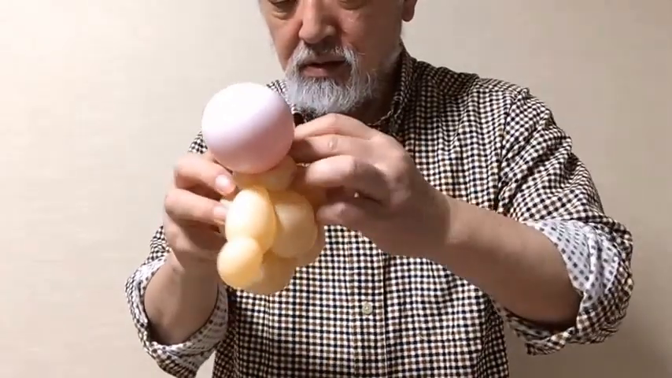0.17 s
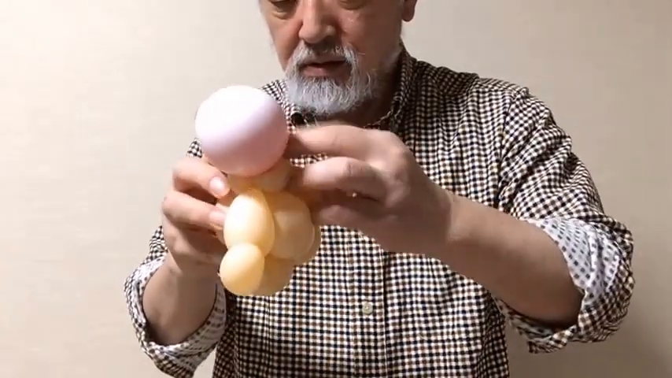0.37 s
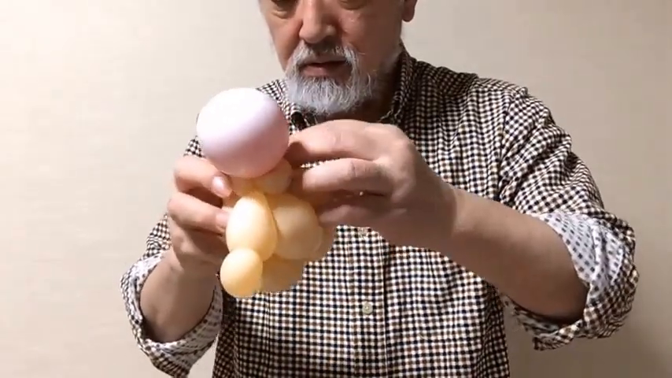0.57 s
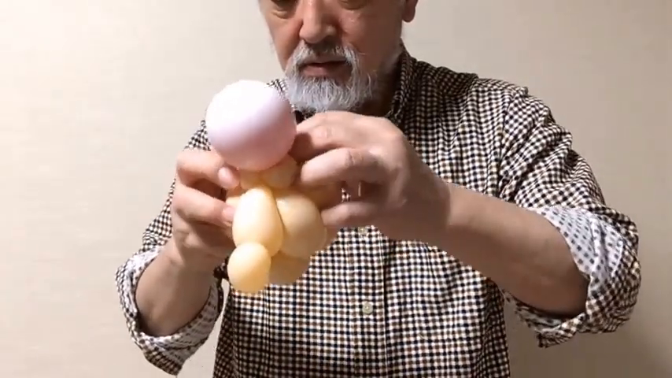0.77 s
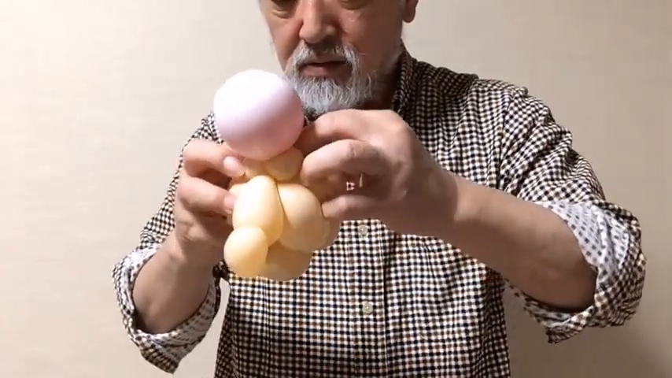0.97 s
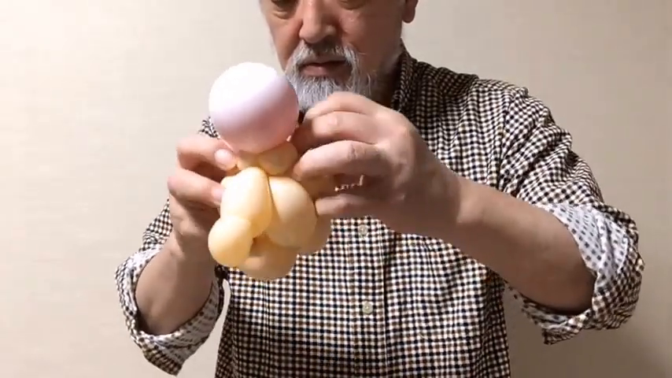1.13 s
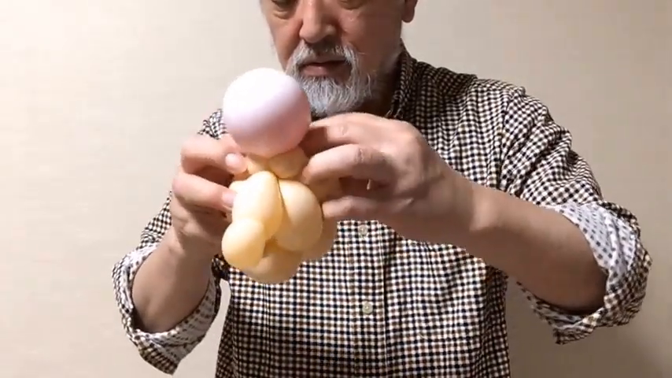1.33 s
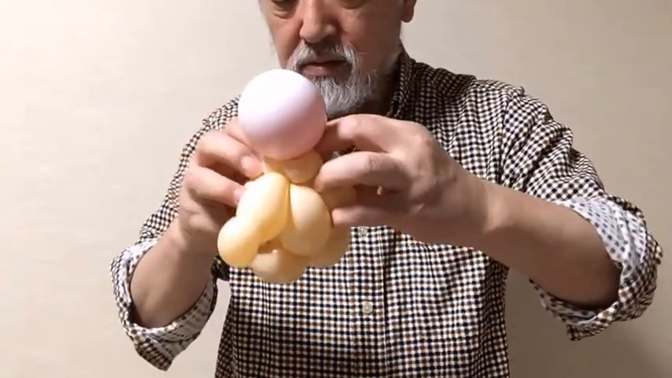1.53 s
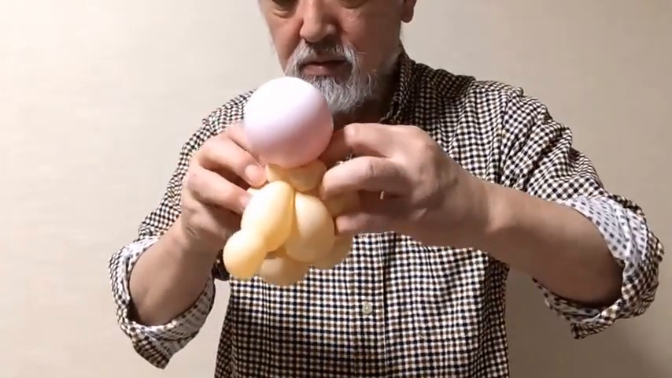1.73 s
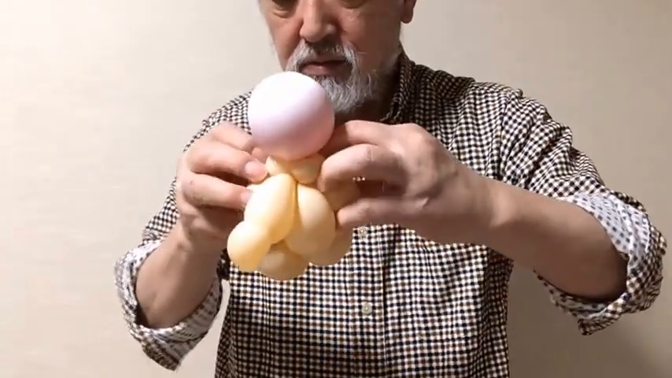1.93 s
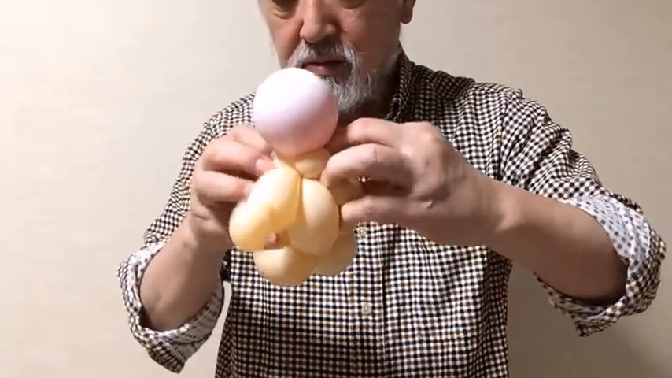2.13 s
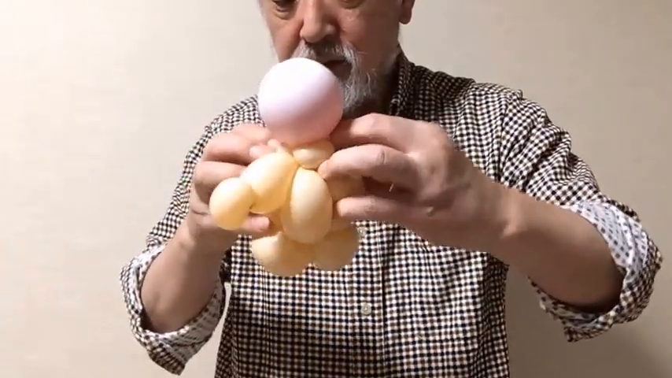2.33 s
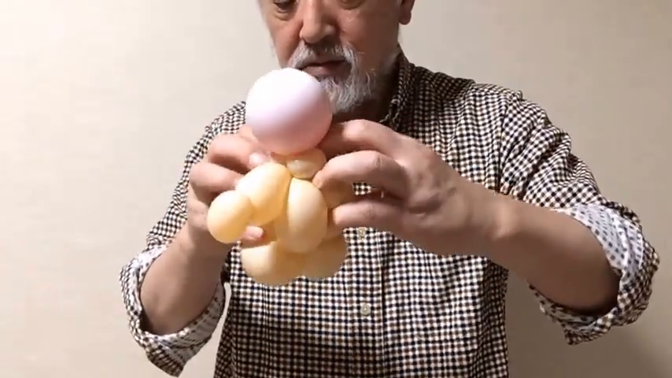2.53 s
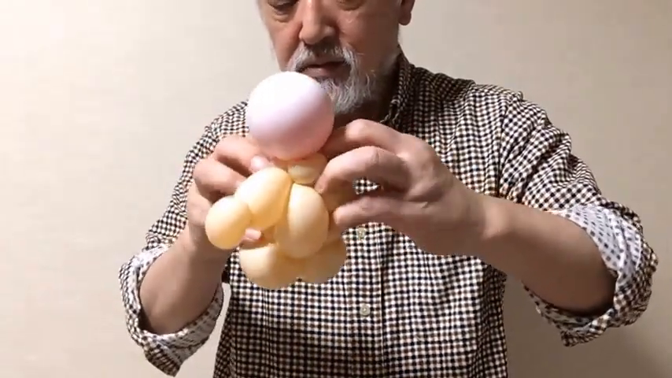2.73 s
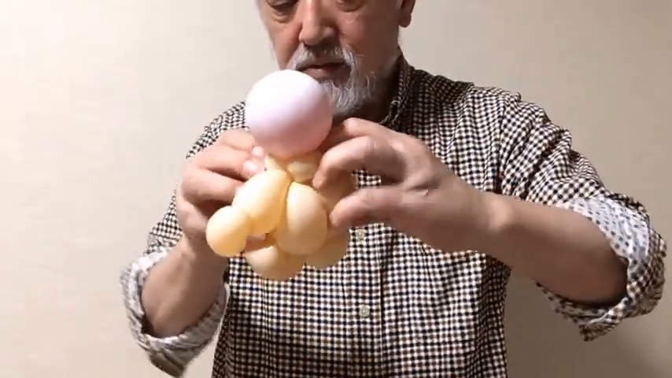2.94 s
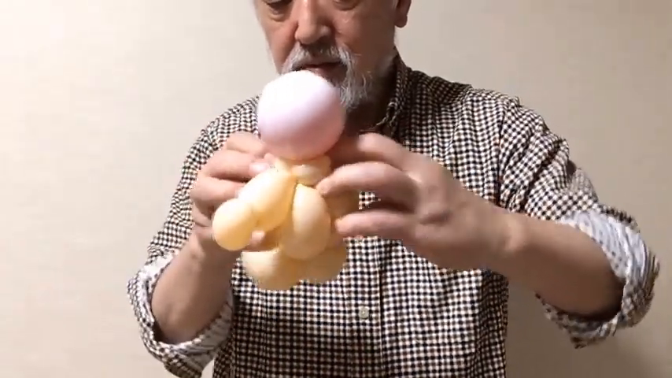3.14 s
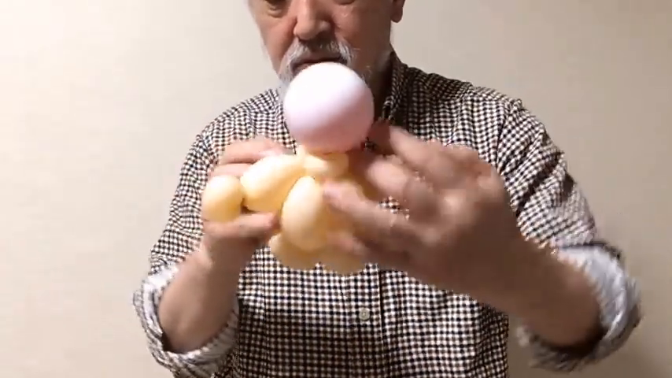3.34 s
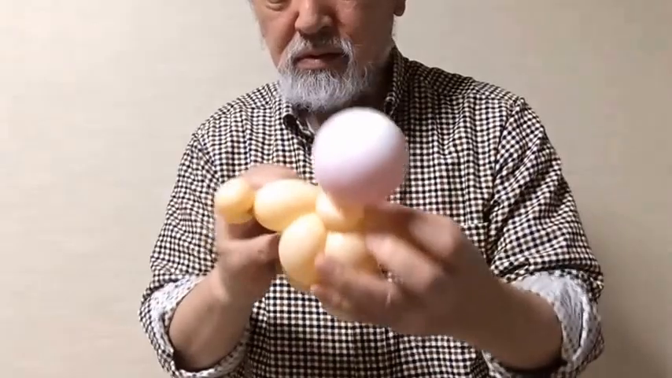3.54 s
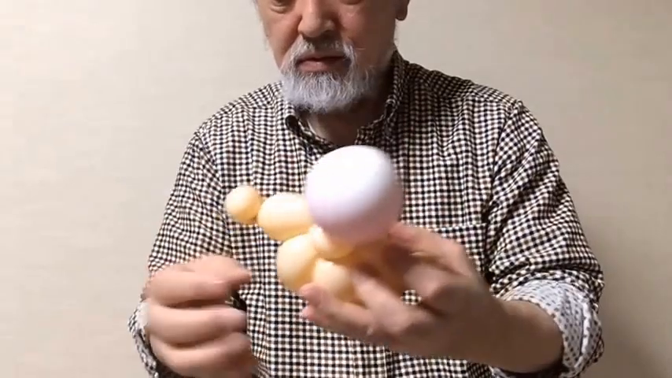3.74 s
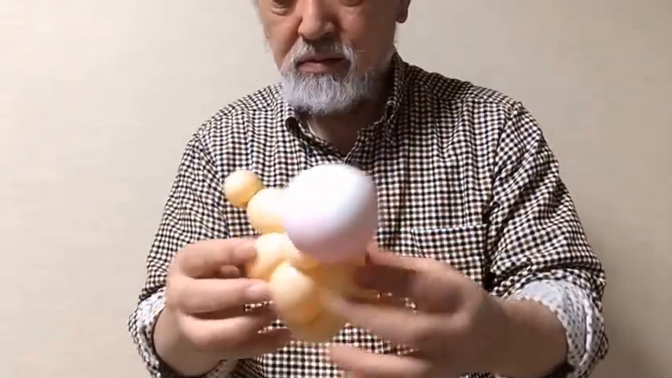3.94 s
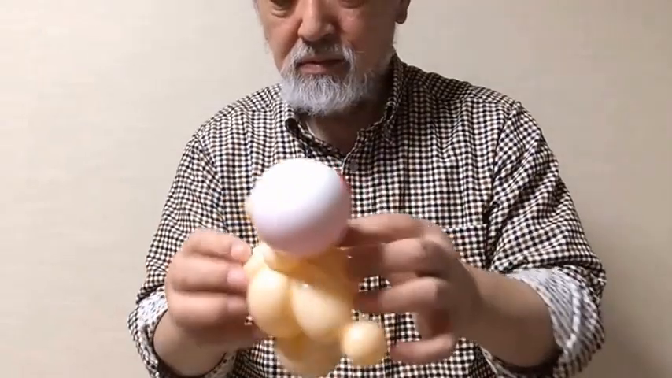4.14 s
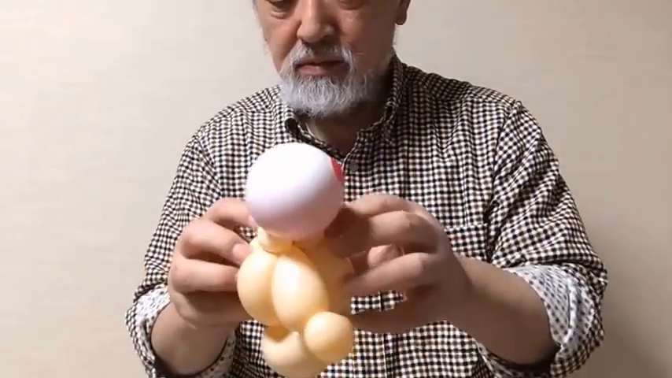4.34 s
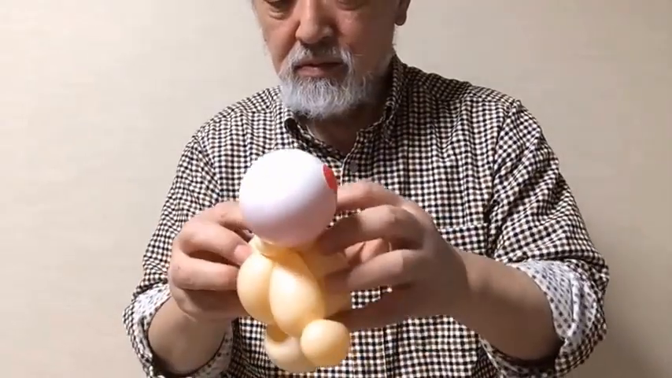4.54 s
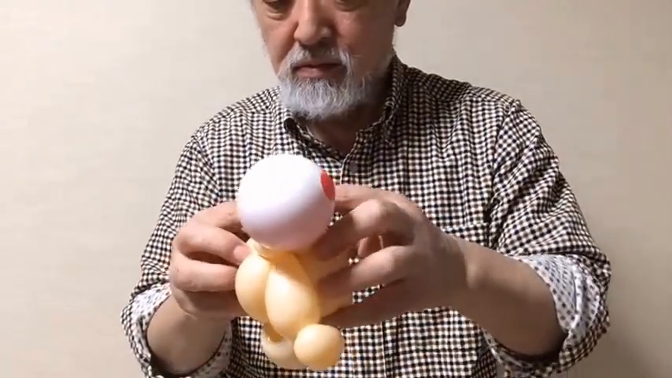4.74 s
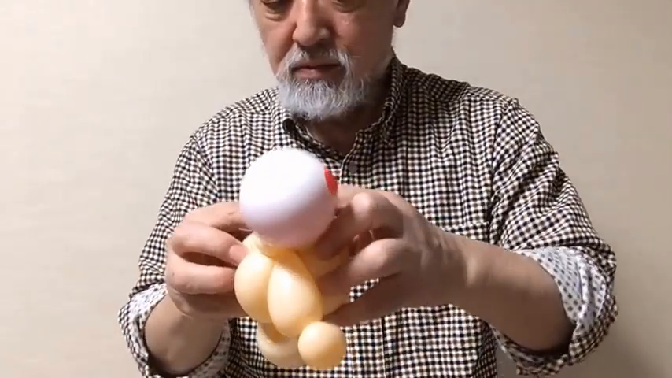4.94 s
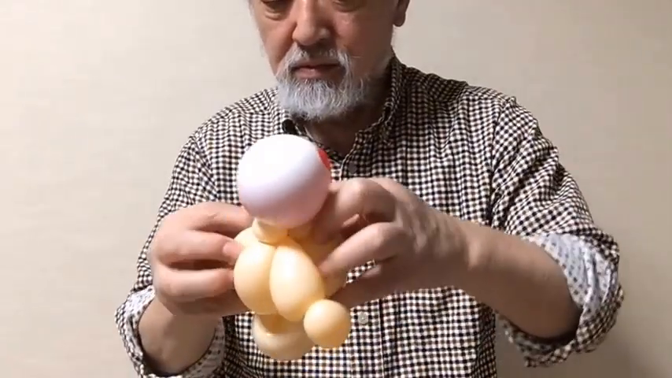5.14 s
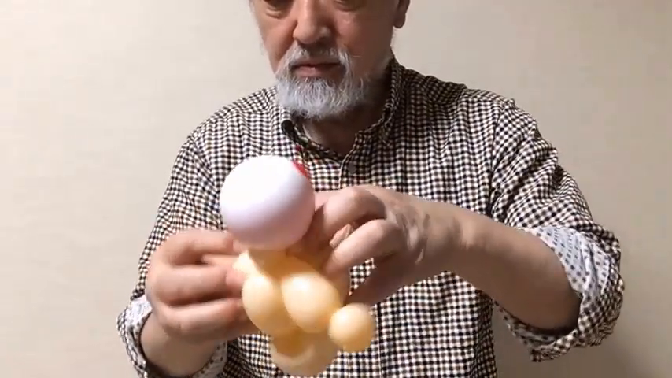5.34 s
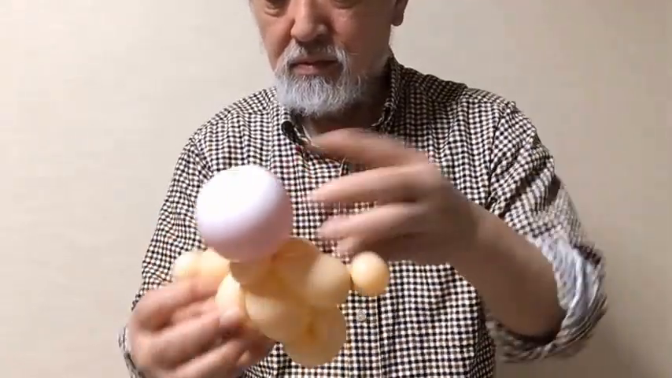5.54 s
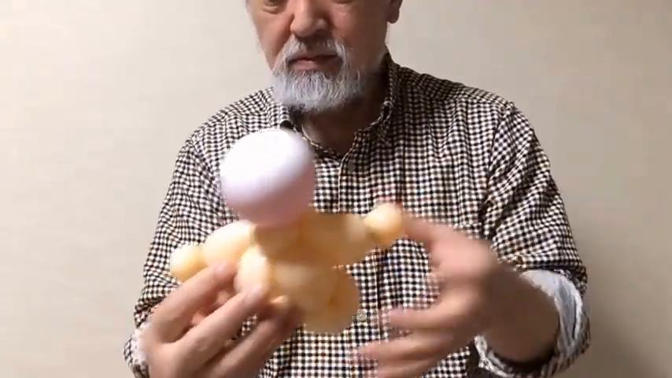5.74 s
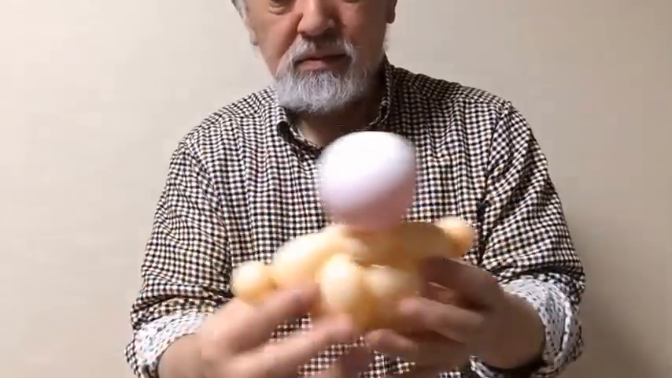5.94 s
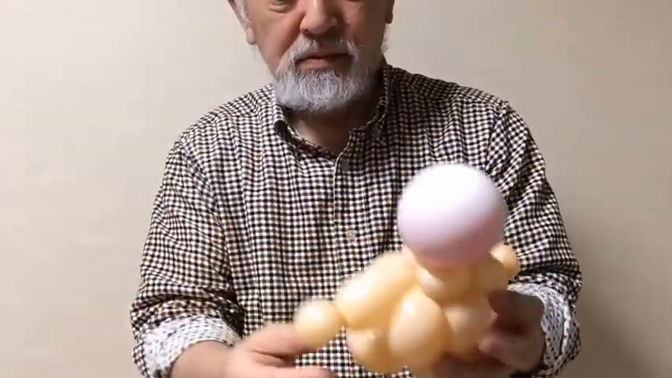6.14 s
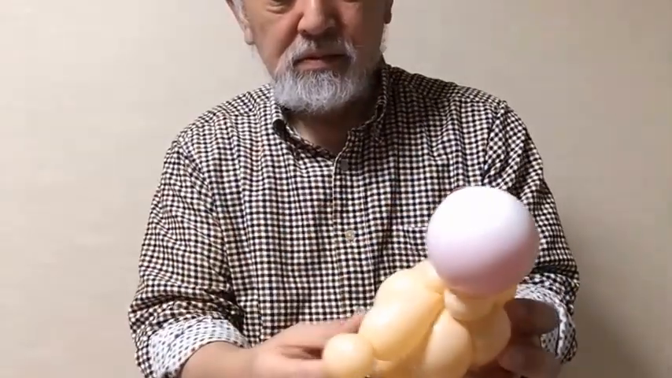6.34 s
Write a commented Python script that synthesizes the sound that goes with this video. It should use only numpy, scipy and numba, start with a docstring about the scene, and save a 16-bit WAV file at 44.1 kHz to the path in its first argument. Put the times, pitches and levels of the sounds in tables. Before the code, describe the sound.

A quiet indoor room with faint, steady air; a camera microphone about a metre from hands twisting small inflated balloons. A tiny squeak opens, then fine dry finger-rub crackle comes and goes in uneven strokes. Snaps click at 0.25 and 0.37 s, and short weak creaks appear around 0.7 and 1.2-1.4 s. At about 1.65 s a tight cluster of hard, hollow rubber snaps is the loudest moment. Brief, strong squeaky creaks come at 2.3-2.5 s, some rising quickly in rate, with duller snaps near 2.7 s. Two short chirps sound around 3.2 s, then a quieter gap from about 3.6 s. From 4 to 5 s, scattered ticks and a slow stuttering creak return; quick squeaks cluster at 5.2-5.5 s. One last chirp at 6 s, then near silence. Soft low bumps and rustling sit underneath, with a short dull room tail.

```python
"""A quiet room: hands twist a figure of small latex balloons, a metre from a camera microphone.
Rubber sticks to rubber and slips free: alone as snaps, in quickening or slowing trains as creaks and
squeaks, and as a fine crackle while fingers rub. Each slip rings the taut skin and the air inside.
Soft fingertip bumps and a low rustle lie beneath; the walls add a short tail over faint room tone."""
import sys
import numpy as np
from scipy import signal
from scipy.fft import rfft, irfft
from scipy.io import wavfile
from numba import njit

SR = 44100
rng = np.random.default_rng(int(sys.argv[2]) if len(sys.argv) > 2 else 0)


def int16_out(signal):
    """Quantize to a 16-bit WAV file."""
    q = np.round(np.clip(np.atleast_2d(signal).T, -1, 1) * 32767)
    wavfile.write(sys.argv[1], SR, q.astype(np.int16))


N = 282240  # samples, 6.4 s

# trains of slips: (start [s], end [s], first rate [slips/s], last rate [slips/s],
# first level [dB], last level [dB], patch ring [Hz], crispness [dB])
SLIP_TRAINS = [ (.001, 0.014, 370, 290, -25.5, -29.5, 1535, -42),
               (0.1, 0.314, 212, 186, -49.5, -37, 7560, -6.5), (0.46, 0.508, 129, 530, -30, -39, 3760, 13),
               (0.689, 0.732, 173, 273, -28.5, -22, 1565, -7.5),
               (0.73, 0.759, 178, 204, -23, -34, 1115, -7),
               (1.217, 1.26, 270, 320, -32.5, -34.5, 2040, -3.5),
               (1.267, 1.292, 870, 510, -30.5, -37, 2280, -3), (1.365, 1.415, 182, 146, -33, -33, 1310, -9),
               (1.577, 1.6, 99, 81, -26, -41, 1440, -14.5), (2.2771, 2.315, 153, 173, -17, -15, 1790, -8.5),
               (2.315, 2.367, 235, 510, -19, -26.5, 1130, -3), (2.4768, 2.51, 165, 580, -13, -27, 1430, -5),
               (3.158, 3.2, 270, 510, -21, -40, 6250, 3), (3.232, 3.257, 250, 874, -20, -34, 892, 3),
               (4.049, 4.061, 355, 330, -27, -24, 1090, -4),
               (4.2936, 4.359, 35.7, 55, -31, -25.5, 2010, -6.5),
               (4.544, 4.564, 300, 476, -25, -28.5, 1277, -4.5),
               (4.737, 4.806, 117, 116, -43.5, -37, 2500, -2.5),
               (5.143, 5.147, 1580, 2000, -35.5, -34.5, 1750, -5),
               (5.266, 5.279, 290, 680, -31.5, -26.5, 1280, -4.5),
               (5.311, 5.368, 480, 283, -27.5, -43.5, 1210, -10),
               (5.421, 5.47, 420, 797, -17, -23.5, 1354, -7), (5.496, 5.508, 1150, 990, -49, -26, 970, -17),
               (6.013, 6.022, 840, 1080, -21, -32.5, 2100, -4.5), ]
# lone slips: (time [s], level [dB], patch ring [Hz], crispness [dB])
LONE_SLIPS = [(0.253, -13, 3400, -15), (0.317, -30.5, 3880, 4.5), (0.368, -16, 4400, -2.5),
              (0.38, -19, 1700, 0.5), (0.388, -24, 4300, 1.5), (0.62, -38, 4360, 11.5),
              (0.928, -20, 2100, -2.5), (1.353, -25, 1320, -13), (1.443, -40, 3750, 2),
              (1.509, -17.5, 2420, -18.5), (1.645, -1, 2800, -21.5), (1.658, -8.5, 1600, -12),
              (1.665, -6.5, 3390, -14), (1.678, -8, 1810, -12), (2.028, -22, 4000, -11.5),
              (2.259, -18, 1430, -15), (2.615, -21, 2650, -15), (2.729, -18, 850, 0),
              (2.744, -19, 940, -2.5), (2.751, -23.5, 875, 4), (3.094, -26, 1200, 4),
              (3.575, -30, 1360, -9.5), (3.982, -20.5, 1145, -12), (4.092, -19.5, 1430, -23),
              (4.095, -19, 800, -6), (4.407, -20.5, 1850, -6), (4.437, -21.5, 2000, -13),
              (4.488, -26.5, 1010, -5), (4.506, -23, 980, -6), (4.524, -20, 1830, -8.5),
              (4.632, -27, 2500, -0.5), (4.8, -22, 1440, -6), (4.826, -31.5, 1770, 0),
              (4.843, -35, 1790, -0.5), (4.881, -38, 2000, -0.5), (4.998, -36, 1540, 8),
              (5.227, -15.5, 1500, -4.5), (5.78, -29, 1650, -12.5), (5.867, -33.5, 1660, -11.5)]
# strokes of the fingers over the latex: (full contact from [s], full contact to [s],
# first level [dB], last level [dB], crispness [dB])
FINGER_STROKES = [ (.01, 0.078, -36, -59.5, 0.5), (0.163, 0.262, -45, -39, 6),
                  (0.387, 0.419, -39.5, -39.5, 3), (0.561, 0.89, -41.5, -46.5, 1.5),
                  (0.896, 1.008, -37, -45.5, 3.5), (1.013, 1.174, -45, -39.5, 0.5),
                  (1.193, 1.285, -45.5, -35, 0.5), (1.458, 1.646, -41.5, -43, -1.5),
                  (1.65, 1.858, -42.5, -47, 0.5), (1.883, 1.979, -48.5, -42, -3),
                  (2.092, 2.241, -46, -47.5, -2.5), (2.384, 2.417, -40, -44.5, -9),
                  (2.476, 2.628, -41, -52.5, -2.5), (2.693, 2.814, -44.5, -45, 1.5),
                  (2.833, 3.1, -41.5, -37.5, -1.5), (3.11, 3.314, -35, -43.5, -1.5),
                  (3.39, 3.635, -61.5, -55, -3.5), (3.954, 4.056, -52, -64.5, -5.5),
                  (4.194, 4.364, -42.5, -40.5, 0), (4.407, 4.564, -41, -31, -3),
                  (4.642, 4.694, -34, -41, -0.5), (4.727, 5.087, -47.5, -42.5, -1),
                  (5.109, 5.196, -36, -43, 2), (5.203, 5.536, -43, -33.5, -1.5),
                  (5.626, 5.92, -48.5, -57, -8), (5.985, 6.066, -35, -54.5, -3.5),
                  (6.394, 6.394, -53, -73, 4.5), ]
# resonances of the balloons' air and skin: (frequency [Hz], width [Hz], level [dB])
BODY_MODES = [(342.5, 224, -2.5), (469.4, 66, -11), (1050, 226, 2), (1274, 439, 7.5), (1734, 600, 6),
              (2690, 625, 6.5)]
# short-lived high modes of the latex around the contact: (frequency [Hz], width [Hz], level [dB])
SKIN_MODES = [(3590, 2400, 4), (6050, 2120, 3.5), (6944, 1570, 1), (12000, 27000, -3)]
# fingertips pressing the balloons: (time [s], level [dB])
FINGERTIP_BUMPS = [(0.251, -52), (2.284, -38), (2.741, -41), (3.975, -48), (4.243, -37), (4.996, -40)]
# spectral shape of the room's air: (frequency [Hz], relative level per Hz [dB])
ROOM_SPECTRUM = [(30, -28), (65, -8), (113, -10.5), (200, -0.5), (426, -10), (15000, -37.5)]

# a smaller, higher spot of skin flicked by every slip: middle pitch, level, cycles to fade by 1/e
FLICK_HZ, FLICK_DB, FLICK_CYCLES = 4250, -5.5, 1.3
TEAR_S = 0.0027  # decay of the ragged tear after a slip
LOCKS_AT = .6  # share of a train after which its slip rate holds
UNEVEN = .08  # scatter of the first gaps in a train, as a share of the gap
# scatter of patch pitch and crispness at the start of a train
RETUNE_OCT, EDGE_DB = .13, 3
RUB_PER_S, RUB_SPREAD_DB, RUB_HZ = 1500, 5.1, 1424
# how fast a stroke swells before full contact and dies after it
TOUCH_DB_PER_S, LIFT_DB_PER_S = 349.5, 352.5
WALLS_T60_S, WALLS_DB, WALLS_HZ = 0.15, -11, 5500
ROOM_DB = -68.5  # RMS at the microphone, before its filters
TOP_HZ = 15400


def slips(s, db, hz, crisp_db, patch_db, body_db, skin_db, cycles, ragged, above_hz):
    """A slip jerks the patch, the whole body and the high skin modes, which a brief ragged tear stirs on."""
    at = np.clip((s * SR).astype(int), 0, N - 1)
    skin_level_db = db + crisp_db + skin_db
    patch, blow, jerk = np.zeros(N), np.zeros(N), np.zeros(N)
    ring_patches(patch, at, undb(db + patch_db), hz, cycles)
    # the flicked spot's pitch jumps about
    flick_hz = FLICK_HZ * 2 ** (0.33 * drift(s, 300, 40))
    ring_patches(patch, at, undb(skin_level_db + FLICK_DB), flick_hz, FLICK_CYCLES)
    np.add.at(blow, at, undb(db + body_db))
    np.add.at(jerk, at, undb(skin_level_db))
    fade = np.exp(-1 / (TEAR_S * SR))
    tear = signal.lfilter([1], [1, -fade], jerk) * rng.standard_normal(N)
    body = ring(blow, BODY_MODES)
    skin = ring(jerk + ragged * tear, SKIN_MODES)
    # small balloons push little air at long wavelengths
    return signal.lfilter(*signal.butter(3, above_hz, "high", fs=SR), patch + body + skin)


@njit
def ring_patches(out, start, size, hz, cycles):
    """Each slip twangs its own patch of skin: a decaying sine that fades by 1/e in the given cycles."""
    for k in range(len(start)):
        w = 2 * np.pi * hz[k] / SR
        turn = np.exp(1j * w - w / (2 * np.pi * cycles))
        z = size[k] + 0j
        for i in range(start[k], min(start[k] + int(40 * cycles / w), len(out))):
            out[i] += z.imag
            z *= turn


def ring(x, modes):
    """Sum of damped resonances with alternating sign, each scaled by its level for a single blow."""
    out = 0
    for k, (hz, width, db) in enumerate(modes):
        r = np.exp(-np.pi * width / SR)
        w = 2 * np.pi * hz / SR
        mode = signal.lfilter([0, np.sin(w)], [1, -2 * r * np.cos(w), r * r], x)
        out = out + (-1) ** k * undb(db) * mode
    return out


def undb(db):
    """dB to gain."""
    return 10 ** (np.asarray(db) / 20)


def drift(s, count, per_s):
    """Random values, per_s of them a second, joined by straight lines and read at times s."""
    return np.interp(s, np.arange(count) / per_s, rng.standard_normal(count))


def snaps():
    """Single hard slips, each ringing the latex by itself."""
    return slips(*np.transpose(LONE_SLIPS), patch_db=-2.0, body_db=-11.5, skin_db=-1.5,
                 cycles=2.67, ragged=0.55, above_hz=360)


def creaks():
    """The slip rate glides geometrically as the contact loosens, then locks to a pitch and steadies."""
    rows = []
    for start, end, first, last, first_db, last_db, hz, crisp_db in SLIP_TRAINS:
        s = start
        for jog, size, tune, edge in rng.standard_normal((99, 4)):
            part = (s - start) / (end - start)
            if part <= 1:
                glide = min(part / LOCKS_AT, 1)
                irregular = 1 - .85 * glide  # some scatter remains after the lock
                scatter = UNEVEN * irregular
                db = first_db + part * (last_db - first_db) + 15 * scatter * size
                patch_hz = hz * 2 ** (RETUNE_OCT * irregular * tune)
                rows.append((s, db, patch_hz, crisp_db + EDGE_DB * irregular * edge))
                rate = first * (last / first) ** glide
                s += np.exp(scatter * jog) / rate
    return slips(*np.transpose(rows), patch_db=1.0, body_db=0.0, skin_db=12.5,
                 cycles=4.5, ragged=.03, above_hz=687)


def rub():
    """Many tiny slips at random moments, a few much larger, in clusters that come and go."""
    gap, size, tune = rng.random((int(3 * RUB_PER_S * N / SR), 3)).T
    s = np.cumsum(-np.log(1 - gap)) / RUB_PER_S
    level_db, crisp_db = strokes(s)
    larger_db = np.minimum(-RUB_SPREAD_DB * np.log(1 - size), 21)
    cluster_db = 1.4 * drift(s, 500, 70)
    db = level_db + larger_db + cluster_db - 4.5
    # the treble comes and goes on its own
    crisp_db = crisp_db + 3 * drift(s, 300, 40)
    # the rubbed patch wanders, so the colour of the crackle drifts
    wander_oct = drift(s, 100, 12) / 7
    hz = RUB_HZ * 2 ** (wander_oct + 0.66 * (tune - .5))
    keep = s < N / SR
    rows = np.array([s, db, hz, crisp_db])[:, keep]
    return slips(*rows, patch_db=-9.5, body_db=-11.5, skin_db=-7.5,
                 cycles=2.82, ragged=0.099, above_hz=323)


def strokes(s):
    """Level and crispness of the rubbing at times s: the strongest stroke at that moment leads."""
    start, end, first_db, last_db, crisp_db = np.transpose(FINGER_STROKES)[..., None]
    part = np.clip((s - start) / (end - start), 0, 1)
    contact_db = first_db + part * (last_db - first_db)
    touch_db = TOUCH_DB_PER_S * np.maximum(start - s, 0)
    lift_db = LIFT_DB_PER_S * np.maximum(s - end, 0)
    db = contact_db - touch_db - lift_db
    return db.max(axis=0), crisp_db[db.argmax(axis=0), 0]


def bumps():
    """A fingertip lands: a short diffuse thud of low noise."""
    push = np.zeros(N)
    s, db = np.transpose(FINGERTIP_BUMPS)
    push[(s * SR).astype(int)] = undb(db)
    fade = np.exp(-1 / (0.018 * SR))  # 18 ms decay
    thud = signal.lfilter([1], [1, -fade], push) * rng.standard_normal(N)
    return ring(thud, [(150, 75, -22), (330, 210, -19.5)])


def handling():
    """A low rustle of hands and sleeves: resonant noise that swells with the rubbing, in lumps."""
    t = np.arange(N) / SR
    swell_db = 0.84 * strokes(t)[0] - 61
    lumps_db = 3.2 * drift(t, 200, 25)
    return ring(undb(swell_db + lumps_db) * rng.standard_normal(N), [(183, 50, 6.1)])


def walls(x):
    """Dull diffuse echoes that build up over a few milliseconds and die away."""
    t = np.arange(SR // 2) / SR
    build_up = 1 - np.exp(-t / 0.0026)
    decay = np.exp(-np.log(1000) * t / WALLS_T60_S)
    tail = rng.standard_normal(len(t)) * build_up * decay
    tail = signal.lfilter(*signal.butter(1, WALLS_HZ, fs=SR), tail)
    tail = tail * undb(WALLS_DB) / np.sqrt(np.sum(tail ** 2))
    return signal.fftconvolve(x, tail)[:N]


def room_tone():
    """Faint steady air of the room: noise shaped by a smooth spectrum."""
    f = np.fft.rfftfreq(N, 1 / SR) + 1  # 1 Hz up, so the logarithm exists
    hz, db = np.transpose(ROOM_SPECTRUM)
    shape = undb(np.interp(np.log(f), np.log(hz), db))
    air = irfft(rfft(rng.standard_normal(N)) * shape, N)
    return air * undb(ROOM_DB) / air.std()


def scene():
    """Balloons and hands up close, their echoes off the walls, and the room behind."""
    balloons = snaps() + creaks() + rub() + bumps() + handling()
    return (balloons + walls(balloons) + room_tone())[None]


def record(dry):
    """The microphone loses the deep bass and cuts the top."""
    dry = signal.lfilter(*signal.butter(2, 75, "high", fs=SR), dry)
    return signal.sosfilt(signal.ellip(8, .2, 60, TOP_HZ, fs=SR, output="sos"), dry)


dry = scene()
out = record(dry)
int16_out(out)
```